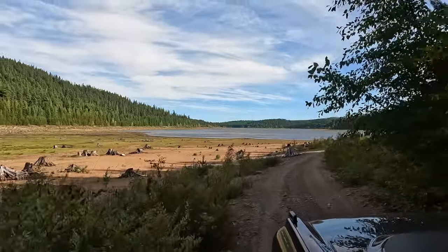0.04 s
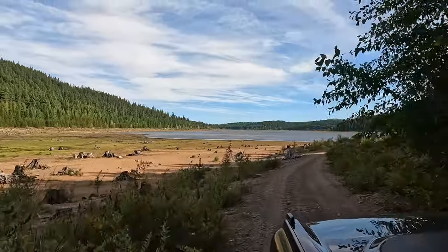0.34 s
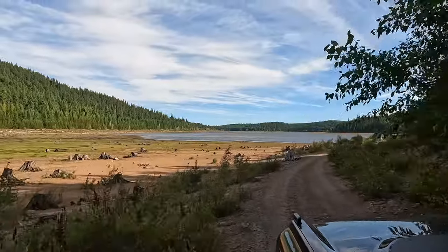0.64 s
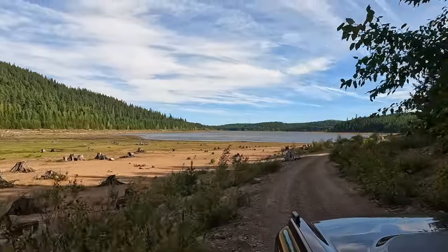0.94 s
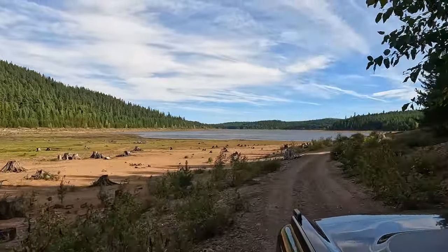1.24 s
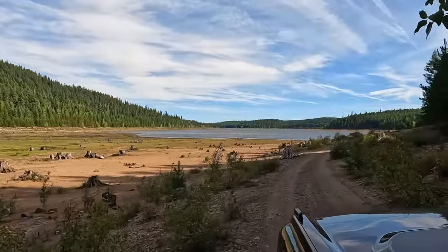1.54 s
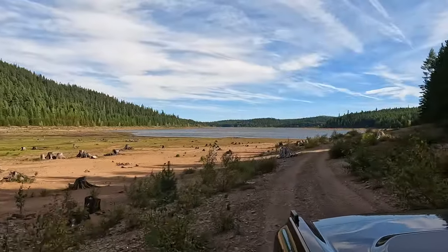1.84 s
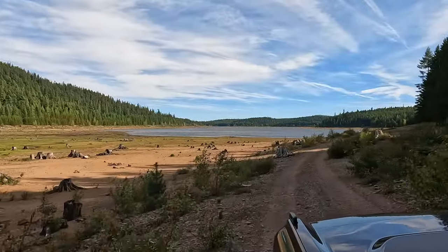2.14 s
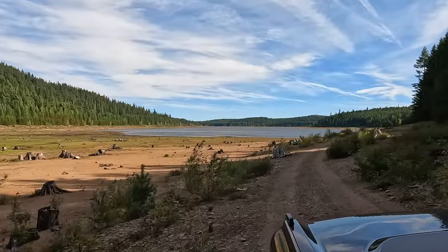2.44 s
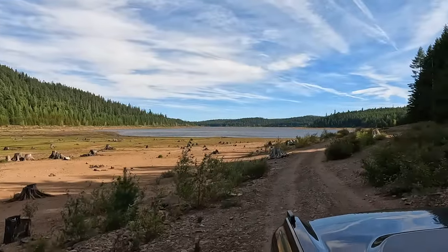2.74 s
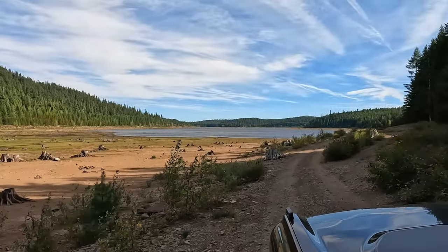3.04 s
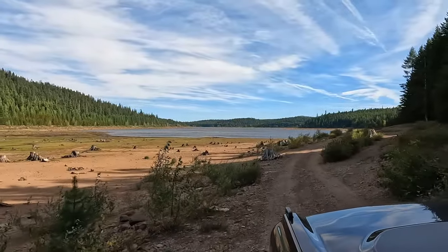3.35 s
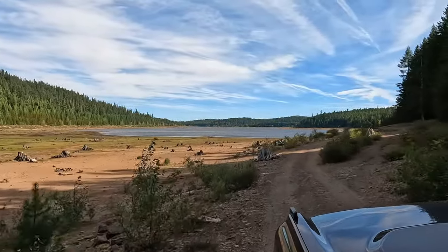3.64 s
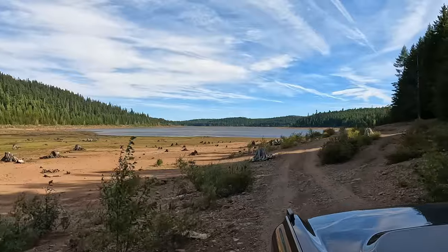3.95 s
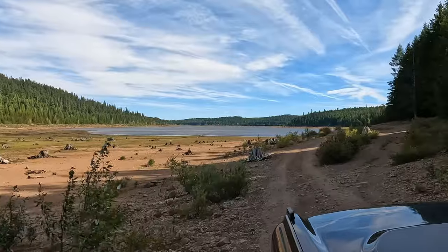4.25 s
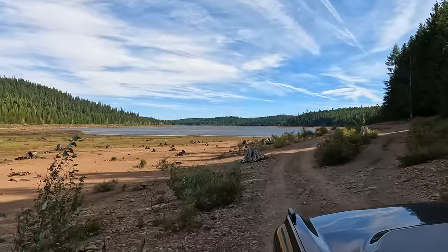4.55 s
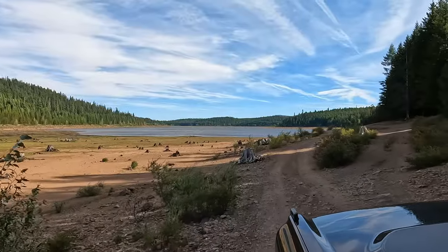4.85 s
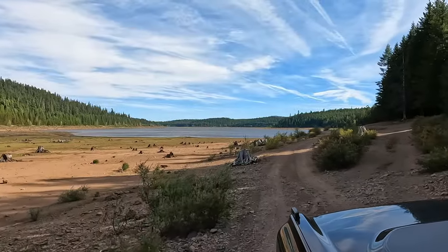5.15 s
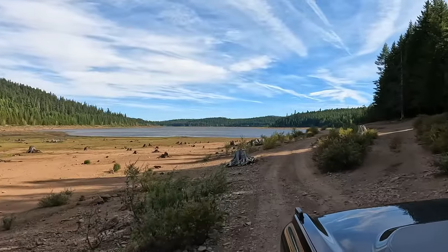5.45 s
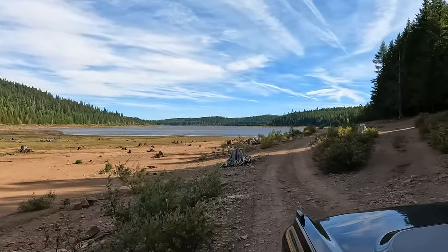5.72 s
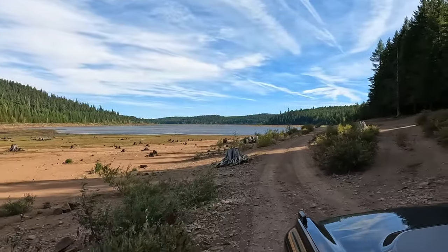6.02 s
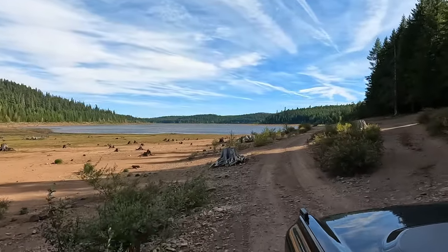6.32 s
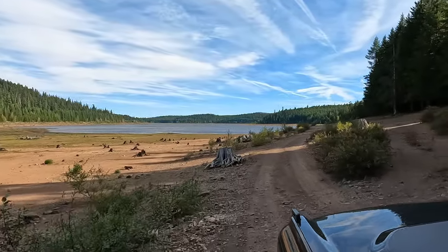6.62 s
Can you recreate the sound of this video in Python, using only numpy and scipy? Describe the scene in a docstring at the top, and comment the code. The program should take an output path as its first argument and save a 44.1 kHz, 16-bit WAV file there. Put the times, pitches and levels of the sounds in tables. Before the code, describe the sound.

Tyres crunch slowly over gravel, stones popping and clicking beneath them, above a low engine drone and thumps from the car's body.

```python
"""Off-road crawl on gravel

An off-road car creeps along a gravel track, heard from its side. Pinched stones pop out from under
the tyres with hollow knocks, click against each other and crunch in a dense bed, with a few thin squeaks.
Beneath, a four-cylinder engine drones and swells, the body booms over ruts and the suspension thumps.
Swaying air rumbles at the microphone, and the cooling fan adds a soft hiss."""
import sys
import numpy as np
from scipy import signal
from scipy.fft import rfft, irfft, next_fast_len
from scipy.io import wavfile
from scipy.ndimage import uniform_filter1d

SR = 44100
rng = np.random.default_rng(int(sys.argv[2]) if len(sys.argv) > 2 else 0)


def int16_out(signal):
    """Quantize to a 16-bit WAV file."""
    q = np.round(np.clip(np.atleast_2d(signal).T, -1, 1) * 32767)
    wavfile.write(sys.argv[1], SR, q.astype(np.int16))


N = 298902
TIME = np.arange(N) / SR

# the loudest stones springing from under the tread:
# (time [s], level [dB], pitch [Hz], t60 [s], hard edge relative to the pop [dB])
STONE_POPS = [(0.0855, -22.5, 516, 0.014, -19), (0.0935, -28, 480, .009, -18), (.102, -21, 624, 0.027, -19),
              (0.524, -38, 393, .018, -22), (.937, -27.5, 780, 0.019, -17), (1.2611, -22, 670, 0.012, -15),
              (1.311, -36, 330, 0.032, -22), (1.3762, -17, 670, 0.0065, -13), (1.3844, -23, 562, .018, -16),
              (1.4856, -22.5, 580, 0.015, -22), (1.502, -15, 655, 0.023, -9),
              (1.758, -23.5, 760, .014, -19), (1.784, -24.5, 395, .02, -21), (2.0306, -18, 694, .0084, -17),
              (2.0405, -15, 693, 0.0051, -25), (2.0592, -25, 610, .011, -19),
              (2.088, -26, 666, 0.0082, -12), (2.163, -22.5, 594, .012, -22),
              (2.2509, -13.5, 710, 0.017, -15.5), (2.6177, -29, 640, .012, -20),
              (2.6318, -19, 710, 0.0075, -22), (2.7145, -20.5, 649, 0.0077, -8),
              (2.8009, -20.5, 720, 0.035, -21), (2.8347, -26.5, 750, .012, -16),
              (3.0656, -27, 480, .014, -24), (3.1374, -20, 705, 0.012, -21),
              (3.1608, -16.5, 920, 0.0089, -20), (3.406, -25, 660, .023, -19),
              (3.443, -23.5, 633, 0.012, -20), (3.6968, -24.5, 600, 0.0073, -21),
              (3.7059, -22, 680, 0.0083, -23), (3.8106, -13, 690, 0.0064, -24),
              (3.821, -22.5, 620, 0.0093, -21), (3.906, -30, 520, 0.015, -20),
              (4.0364, -31, 450, 0.014, -22), (4.168, -26, 710, 0.012, -21), (4.1968, -32, 470, .014, -22),
              (4.239, -26.5, 650, 0.016, -17), (4.310, -25.5, 454, 0.044, -22),
              (4.3497, -24.5, 386, .043, -22), (4.431, -26, 525, 0.01, -20),
              (4.7198, -19.5, 510, 0.0068, -21), (4.8982, -23, 697, 0.035, -17),
              (5.5663, -25, 640, .012, -20), (5.583, -18.5, 340, 0.016, -20),
              (5.81, -29.5, 420, 0.017, -17), (5.908, -24.5, 464, 0.015, -21),
              (5.9949, -18.5, 484, 0.0084, -11), (6.003, -25.5, 654, .013, -10),
              (6.0916, -27, 407, 0.024, -14), (6.181, -28, 576, 0.016, -20), (6.293, -32, 370, 0.023, -19),
              (6.4735, -18, 780, 0.0094, -29), (6.574, -24.5, 693, 0.0084, -21)]


def undb(db):
    """Decibels to gain."""
    return 10 ** (np.asarray(db) / 20)


def unit(x):
    """Scale to rms 1."""
    return x / np.sqrt(np.mean(x ** 2))


def curves(table):
    """The columns of an automation table, one value a sample."""
    times, *columns = np.transpose(table)
    return [np.interp(TIME, times, column) for column in columns]


def hump(s, length):
    """A smooth rise and fall that reaches 1 at time s."""
    return np.cos(np.pi * np.clip((TIME - s) / length, -.5, .5)) ** 2


def walk(rate):
    """Random drift: levels held for 1 / rate seconds and smoothed twice; spread about 1.5."""
    hold = int(SR / rate)
    steps = np.repeat(rng.standard_normal(N // hold + 1), hold)
    return 2.075 * uniform_filter1d(uniform_filter1d(steps, hold), hold)[:N]


def colour(x, points):
    """Minimum-phase EQ through (frequency [Hz], gain [dB]) points; rms 1."""
    size = 2 * next_fast_len(N)
    hz, db = np.transpose(points)
    freq = np.maximum(np.arange(size // 2 + 1) * SR / size, 1)
    gain = undb(np.interp(np.log(freq), np.log(hz), db))
    cepstrum = irfft(np.log(gain))
    cepstrum[1:size // 2] *= 2  # folded forward, so nothing rings ahead of an attack
    cepstrum[size // 2 + 1:] = 0
    return unit(irfft(rfft(x, size) * np.exp(rfft(cepstrum)))[:N])


def fade(t60):
    """Exponential decay, cut after a tenth of a second."""
    return np.exp(-np.log(1000) * TIME[:SR // 10] / t60)


def ring(hz, t60):
    """A damped resonance that builds up over its first half cycle; peak 1."""
    cycles = hz * TIME[:SR // 10]
    attack = 1 - np.exp(-(2 * cycles) ** 2)
    tone = np.sin(2 * np.pi * cycles) * fade(t60) * attack
    return tone / np.abs(tone).max()


def snap(hz, cycles):
    """A rounded contact: a short tone that peaks after the given number of cycles and dies; peak 1."""
    turns = hz * TIME[:SR // 10]
    rise = turns / cycles
    return (rise * np.exp(1 - rise)) ** 3 * np.cos(2 * np.pi * (turns - cycles))


def burst(lo_hz, hi_hz, t60):
    """A dying puff of band noise; peak 1."""
    band = signal.butter(2, [lo_hz, hi_hz], "band", fs=SR, output="sos")
    puff = signal.sosfilt(band, rng.standard_normal(SR // 10) * fade(t60))
    return puff / np.abs(puff).max()


def crumble(lo_hz, hi_hz, t60):
    """Grit gives way in a dying cluster of tiny cracks; starts near rms 1."""
    n = SR // 10
    band = signal.butter(4, [lo_hz, hi_hz], "band", fs=SR, output="sos")
    cracks = rng.standard_normal(n) * (rng.random(n) < .1)
    return unit(signal.sosfilt(band, cracks)) * fade(t60)


def grains(per_s, spread_db, cycles, lo_hz, hi_hz, sizes):
    """Random contacts, mostly light, a few hard, on stones of several sizes; roughly white in its band."""
    out = np.zeros(N)
    for hz in np.geomspace(lo_hz, hi_hz, sizes):
        touch = rng.random(N) < per_s / sizes / SR
        force = undb(spread_db * np.minimum(rng.standard_exponential(N), 4.5)) * rng.choice([-1, 1], N)
        ringing = signal.oaconvolve(touch * force, ring(hz, cycles / hz))[:N]
        out += np.sqrt(hz) * unit(ringing)
    return out


def rumble(db, points):
    """Coloured noise, evened out over an eighth of a second so that it follows the given level."""
    swing = colour(rng.standard_normal(N), points)
    strength = np.sqrt(uniform_filter1d(swing ** 2, size=SR // 8))
    return swing / strength * undb(db)


def add(out, s, sound):
    """Mix a sound in at time s."""
    start = max(int(s * SR), 0)
    out[start:start + len(sound)] += sound[:N - start]


def tread(load_db):
    """Stones shift under the rubber: dull, dense knocking over a rolling noise."""
    # tone of gravel under the tyre: (frequency [Hz], gain [dB])
    tread_eq = [(50, -6.5), (90, 9), (150, 1), (200, 1), (250, -2), (320, 1), (450, 0), (650, 0), (800, -1),
                (1000, -6.5), (1250, -11), (1600, -18.5), (2500, -18.5), (5000, -23), (15000, -103)]
    stones = grains(per_s=1000, spread_db=2.5, cycles=8.6, lo_hz=151.6, hi_hz=2660, sizes=15)
    rolling = undb(-2) * colour(rng.standard_normal(N), tread_eq)
    flutter_db = 1.1 * walk(30)
    return (colour(stones, tread_eq) + rolling) * undb(load_db - 1.41 + flutter_db)


def grit(grit_db):
    """Small stones grind against each other in a steady stream of fine, short ticks."""
    # tone of loose grit: (frequency [Hz], gain [dB])
    grit_eq = [(500, -20.5), (1200, 7), (1700, 9.5), (2600, 3), (3300, 2), (4200, -2), (5200, -3.5),
               (6200, -11), (7500, -14), (10000, -27.5), (15000, -55)]
    stones = grains(per_s=1300, spread_db=2.2, cycles=5, lo_hz=980, hi_hz=11600, sizes=14)
    flurry_db = .6 * walk(45)
    return colour(stones, grit_eq) * undb(grit_db + .56 + flurry_db)


def sand(grit_db):
    """Short sprays of very fine grains fizz above the grit."""
    spray = unit(grains(per_s=700, spread_db=1.5, cycles=5, lo_hz=6200, hi_hz=10100, sizes=4))
    patches_db = 2.5 * np.clip(walk(16), -2, 2)
    return spray * undb(grit_db - 23 + patches_db)


def pebbles(grit_db):
    """Stray pebbles tick at random, and sharp chips crackle high above them."""
    ticks = unit(grains(per_s=35, spread_db=1, cycles=6.7, lo_hz=2300, hi_hz=5260, sizes=6))
    chips = unit(grains(per_s=70, spread_db=3.5, cycles=6, lo_hz=6000, hi_hz=10500, sizes=4))
    return (undb(-14) * ticks + undb(-26) * chips) * undb(grit_db)


def engine():
    """A low, slightly rough exhaust drone swells under load; each order wavers on its own."""
    # engine speed: (time [s], firing rate [Hz])
    speed = [(0, 65.27), (1.2, 68.57), (2.65, 66.6), (3.1, 71.45), (4, 70.75), (5.3, 67.35)]
    # exhaust tones, the fractions from unequal cylinders: (multiple of the firing rate, level [dB])
    orders = [(.5, -20), (1, -1), (1.25, -8), (1.5, -9.5), (1.75, -11.5), (2, -13.5), (2.25, -17),
              (2.5, -20)]
    # pulls under load: (time of the crest [s], length [s], rise [dB])
    swells = [(0.927, .8, 10.5), (2.664, 0.87, 12.5), (3.04, .43, 6), (3.69, .9, 7.5), (5.35, .53, 8),
              (6.717, .45, 12.5)]
    firing_hz, = curves(speed)
    crawl_db, speed_wobble = -42, .00652
    swell_db = sum(rise_db * hump(s, length) for s, length, rise_db in swells)
    phase = 2 * np.pi * np.cumsum(firing_hz * (1 + speed_wobble * walk(29.47))) / SR
    drone = np.zeros(N)
    for order, db in orders:
        drone += undb(db + 1.3 * walk(11)) * np.sin(order * phase + 2 * np.pi * rng.random())
    return drone * undb(crawl_db + swell_db)


def chassis():
    """The chassis shakes with a deep rumble that comes and goes on the uneven ground."""
    # strength of the shaking: (time [s], level [dB])
    shake = [(0, -28), (.45, -29.5), (.85, -33.5), (1.3, -30), (1.8, -32), (2.7, -36.5), (3.4, -42),
             (4.2, -35.5), (4.9, -34), (5.8, -36.5), (6.25, -32.5), (6.7, -34)]
    # tone of the chassis: (frequency [Hz], gain [dB])
    chassis_eq = [(15, -2.5), (28, -3.5), (42, 2), (58, -10.5), (82, -12.5), (150, -20.5), (300, -36),
                  (1000, -102), (4000, -120)]
    shake_db, = curves(shake)
    lurch_db = 2.2 * walk(8)
    return rumble(shake_db + lurch_db, chassis_eq)


def sway():
    """Air pushes slowly on the microphone in gusts; the largest pressure swings are rounded off."""
    # strength of the push: (time [s], level before the soft clip [dB])
    push = [(0, -8.5), (.25, -17), (.46, -10), (.85, -11.5), (1.35, -11), (1.9, -11.5), (2.25, -10),
            (2.4, -18.5), (2.8, -8.5), (3.02, -13), (3.22, -7.5), (3.62, -16.5), (4.03, -9), (4.27, -15),
            (5.05, -9.5), (5.22, -13.5), (5.9, -13.5), (6.7, -13.5)]
    # sub-bass tone of the moving air: (frequency [Hz], gain [dB])
    sway_eq = [(3, -19), (9, 2.5), (15, 1.5), (21, -4), (28, -14.5), (40, -38.5), (80, -73.5), (200, -100)]
    push_db, = curves(push)
    gust_db = 1.6 * walk(6)
    ceiling = .55
    return ceiling * np.tanh(rumble(push_db + gust_db, sway_eq) / ceiling)


def air():
    """Smooth, steady hiss of the cooling fan and open air."""
    # tone of the hiss: (frequency [Hz], gain [dB])
    hiss_eq = [(100, 6), (700, 8), (2000, 0), (5000, -6), (8000, -11.5), (12000, -14.5), (16000, -19)]
    return undb(-57) * colour(rng.standard_normal(N), hiss_eq)


def jolts():
    """A wheel drops into a rut and the body booms for a few cycles on its springs."""
    # drops into ruts: (time [s], level [dB], pitch of the body [Hz])
    ruts = [(0.018, -20, 38.5), (0.367, -14.5, 42.7), (1.295, -18.5, 56), (1.707, -17, 45),
            (2.136, -26, 41), (2.361, -28, 41.7), (2.703, -25, 40.6), (3.81, -24.5, 68), (4.699, -22, 36.2),
            (4.986, -13, 33), (5.29, -26, 45.5), (5.652, -30, 36.2), (6.059, -16.5, 38), (6.69, -23, 48.7)]
    out = np.zeros(N)
    t = TIME[:SR // 3]
    rise = t / .017  # crests after 17 ms
    envelope = (rise * np.exp(1 - rise)) ** 2
    for s, db, hz in ruts:
        add(out, s, undb(db) * envelope * np.sin(2 * np.pi * hz * t))
    return out


def clicks():
    """Two stones graze, then snap together with a dry tick and a brief ring; grit crumbles between."""
    # the loudest hits of stone on stone: (time [s], level [dB], pitch [Hz], splinter level [dB])
    stone_hits = [(.061, -33, 2600, -72), (.2124, -30.5, 2510, -59), (0.3698, -38, 3130, -65),
                  (1.113, -39, 3280, -65), (1.292, -33, 4400, -62), (1.3097, -30, 3260, -62),
                  (1.611, -28, 1900, -60), (1.7665, -34, 2350, -60), (1.7794, -32, 2480, -62),
                  (1.837, -43, 4310, -46), (1.846, -34, 3150, -58), (1.9722, -35, 2880, -55),
                  (1.983, -48, 5500, -48), (2.218, -33, 6500, -49), (2.2464, -32.5, 2360, -53),
                  (2.2548, -34, 2440, -56), (2.3315, -33, 5850, -43), (2.3397, -34, 5600, -47),
                  (2.3456, -35, 6500, -44), (2.3903, -29.5, 2740, -53), (2.462, -32, 3680, -45),
                  (2.5251, -27, 2640, -41), (2.5757, -33.5, 2350, -60), (2.612, -44, 3550, -41.5),
                  (2.635, -33.5, 3300, -60), (2.703, -28.5, 4730, -54), (2.7173, -28, 4500, -46),
                  (2.7258, -16.5, 3450, -45), (2.8347, -35.5, 2430, -62), (2.9195, -30.5, 3670, -48),
                  (3.161, -26, 2360, -53), (3.276, -31.5, 2670, -60), (3.483, -30, 2470, -60),
                  (3.5313, -35, 2560, -60), (3.5767, -27.5, 3520, -62), (3.7044, -35.5, 2480, -62),
                  (3.864, -27.5, 3580, -54), (3.9556, -23, 4650, -46), (4.195, -34.5, 4750, -56),
                  (4.240, -34, 2980, -51), (4.490, -30.5, 3150, -57), (4.5692, -30.5, 2520, -61),
                  (4.94, -28.5, 3700, -45), (5.083, -32, 3060, -58), (5.2294, -32, 4650, -53),
                  (5.247, -39, 3900, -44), (5.3, -34.5, 2560, -60), (5.606, -30, 5200, -50),
                  (5.847, -35.5, 2800, -60), (6, -38, 2420, -63), (6.0453, -30.5, 2700, -46),
                  (6.17, -35, 3330, -52), (6.2267, -33, 2630, -58), (6.422, -32.5, 3220, -54),
                  (6.585, -42, 2670, -58)]
    typical_db = -28
    out = np.zeros(N)
    for s, db, hz, splinter_db in stone_hits:
        tick = snap(hz, cycles=1.2)
        note = undb(-10) * snap(hz, cycles=3.2)
        larger_stone = undb(-14) * snap(.62 * hz, cycles=2.55)
        graze = undb(-12) * snap(.76 * hz, cycles=1)
        crumble_db = -44 + 1.17 * (db - typical_db)  # harder hits crush more grit
        add(out, s, undb(db) * (tick + note + larger_stone))
        add(out, s - .0014, undb(db) * graze)
        add(out, s - .004, undb(crumble_db) * crumble(lo_hz=2030, hi_hz=5360, t60=.054))
        add(out, s, undb(splinter_db) * burst(lo_hz=6500, hi_hz=11500, t60=.014))
    return out


def thumps():
    """The suspension takes a blow and rings low and briefly."""
    # blows from the bigger stones: (time [s], level [dB], pitch [Hz], t60 [s])
    blows = [(0.076, -25, 207, 0.21), (1.31, -28.5, 202, 0.045), (1.781, -25, 234, 0.046),
             (2.031, -22, 293, 0.028), (3.81, -24, 240, 0.029), (4.311, -25.5, 182, 0.076),
             (4.72, -29.5, 230, 0.035), (5.583, -30, 276, 0.054), (5.808, -30, 290, 0.03),
             (5.996, -23, 303, 0.037), (6.061, -28, 234, 0.031), (6.292, -31, 240, 0.034)]
    out = np.zeros(N)
    for s, db, hz, t60 in blows:
        add(out, s, undb(db) * ring(hz, t60))
    return out


def climbing():
    """Extra load in dB while the tread presses on a stone that is about to pop."""
    rise_db, lead_s, width_s = 2.5, .0046, .0051
    press = sum(np.exp(-((TIME - s + lead_s) / width_s) ** 2) for s, *_ in STONE_POPS)
    return rise_db * np.minimum(press, 1)


def wheel_arch():
    """The wheel arch and tyre wall ring after a blow, tuned a little differently each time."""
    # their resonances: (frequency [Hz], t60 [s], relative level [dB])
    modes = [(193, 0.049, -19), (314, 0.021, 6), (459.4, 0.15, 5), (622, 0.09, -10), (643, 0.23, -14),
             (786, 0.047, 9), (1184, 0.023, 4)]
    detune = .06
    return sum(undb(db) * rng.choice([-1, 1]) * ring(hz * (1 + detune * rng.uniform(-1, 1)), t60)
               for hz, t60, db in modes) / 2


def knocks():
    """A pinched stone springs free: the tyre pops hollowly, the arch rings on and the ground settles."""
    typical_db, typical_hz = -21, 650
    out = np.zeros(N)
    for s, db, hz, t60, edge_db in STONE_POPS:
        pop = ring(hz, t60) + undb(edge_db) * snap(1.787 * hz, cycles=1.52)
        arch = undb(-16.5) * wheel_arch()
        settling = undb(-17) * crumble(lo_hz=460, hi_hz=1130, t60=.085)
        # harder blows and bigger, lower stones thud more
        thud_db = -36 + .37 * (db - typical_db) - 14.5 * np.log2(hz / typical_hz)
        add(out, s, undb(db) * (pop + arch))
        add(out, s - .003, undb(db) * settling)  # the stone starts to slip just before it pops
        add(out, s, undb(thud_db) * burst(lo_hz=140, hi_hz=354, t60=.13))
    return out


def squeaks():
    """Faint, very high, rough chirps of several tones that swell and die."""
    # thin squeaks: (time [s], pitch [Hz], length [s], level [dB], jitter [share of the pitch])
    chirps = [(.09, 10400, .03, -70, .006), (.25, 10300, .03, -70, .006), (.897, 12500, .05, -68, .03),
              (1.465, 10300, .035, -67, .006), (1.613, 10450, 0.059, -61, .016),
              (1.886, 14000, .06, -57, .004), (2.125, 10400, .035, -63, .012),
              (4.39, 13100, .04, -68.5, .025), (5.077, 12850, .045, -64, .018)]
    # tones of one squeak: (multiple of its pitch, level [dB])
    partials = [(.74, -10), (1, -2), (1.34, -17)]
    out = np.zeros(N)
    for s, hz, length, db, jitter in chirps:
        n = int(length * SR)
        phase = 2 * np.pi * np.cumsum(hz * (1 + jitter * walk(1500)[:n])) / SR
        tones = sum(undb(tone_db) * np.sin(ratio * phase) for ratio, tone_db in partials)
        roughness_db = 3.4 * walk(300)[:n]
        add(out, s, undb(db + roughness_db) * np.hanning(n) * tones)
    return out


def crunches():
    """The tread crushes pockets of fine gravel: short surges of sharp crackles."""
    # crushed pockets: (time of the crest [s], length [s], level [dB])
    pockets = [(.73, .06, -64), (1.89, .04, -52.5), (2.13, .08, -54.5), (2.355, 0.055, -54),
               (2.75, .03, -51), (3.072, .04, -53), (3.21, .03, -58), (3.556, .02, -63),
               (5.095, 0.045, -55), (5.706, .02, -57), (6.253, .03, -57), (6.428, .04, -57)]
    # bright tone of the crackles: (frequency [Hz], gain [dB])
    crunch_eq = [(2000, -3), (4500, 2), (7500, -6), (10000, -14), (14000, -24)]
    cracks = grains(per_s=550, spread_db=2.5, cycles=4, lo_hz=3000, hi_hz=13000, sizes=7)
    surge = sum(undb(db) * hump(s, length) for s, length, db in pockets)
    return colour(cracks, crunch_eq) * surge


def scene():
    """Tyres on gravel over the engine, the shaking chassis and the swaying air, in mono."""
    # how stony the track is: (time [s], load on the tread [dB], loose grit [dB])
    track = [(0, -40.5, -53), (.22, -42, -55.5), (.5, -41, -55.5), (.9, -43, -57), (1.25, -39.5, -55.5),
             (1.55, -39.5, -53), (1.72, -36.5, -60), (2.1, -37.5, -53), (2.35, -35, -51.5),
             (2.5, -38.5, -50.5), (2.73, -37, -53), (2.9, -42.5, -53.5), (3.13, -35.5, -51.5),
             (3.27, -41, -51.5), (3.48, -38, -49), (3.65, -42, -51), (4.05, -39, -56), (4.52, -40.5, -53),
             (4.72, -40, -58), (4.93, -39.5, -51), (5.23, -40.5, -50), (5.38, -40, -51.5), (5.68, -41, -55),
             (5.8, -39.5, -51), (6.22, -39.5, -51.5), (6.33, -43, -54.5), (6.45, -39, -50),
             (6.75, -38.5, -50)]
    load_db, grit_db = curves(track)
    bed = tread(load_db + climbing()) + grit(grit_db) + sand(grit_db) + pebbles(grit_db)
    accents = crunches() + knocks() + clicks()
    car = engine() + jolts() + thumps() + chassis() + squeaks()
    return (bed + accents + car + sway() + air())[None]


def record(dry):
    """A steep low-pass trims the very top."""
    top_hz = 15800
    return signal.sosfilt(signal.ellip(8, .2, 70, top_hz, fs=SR, output="sos"), dry)


dry = scene()
out = record(dry)
int16_out(out)
```